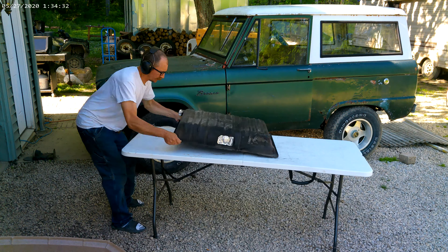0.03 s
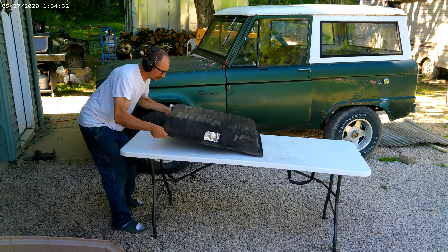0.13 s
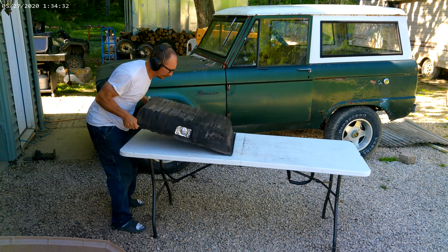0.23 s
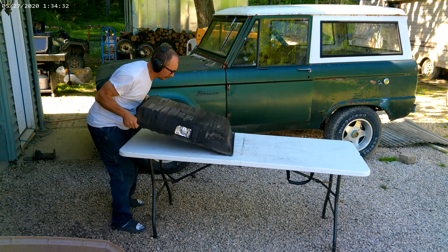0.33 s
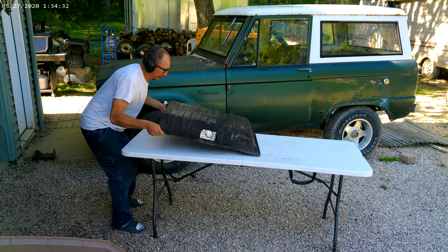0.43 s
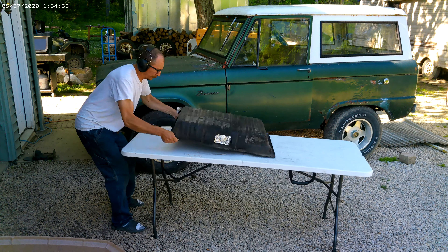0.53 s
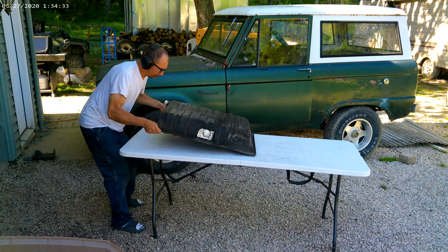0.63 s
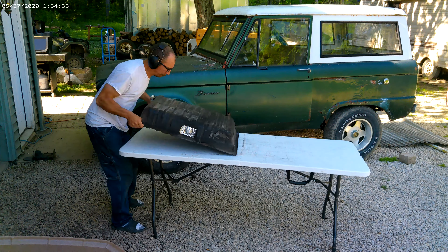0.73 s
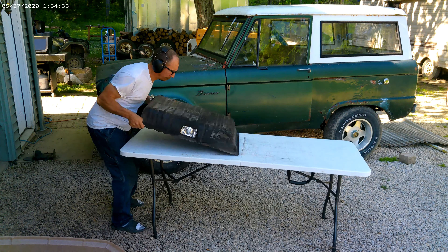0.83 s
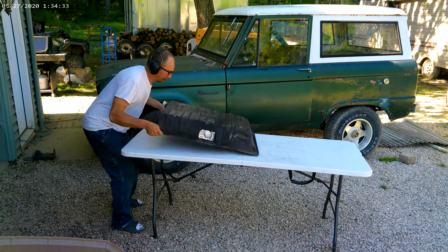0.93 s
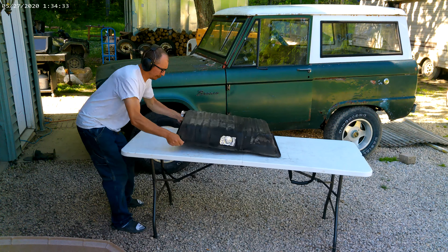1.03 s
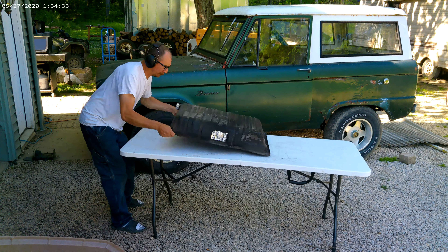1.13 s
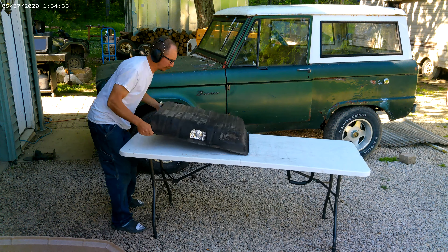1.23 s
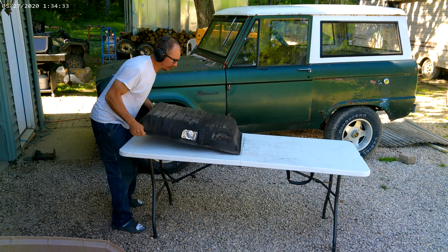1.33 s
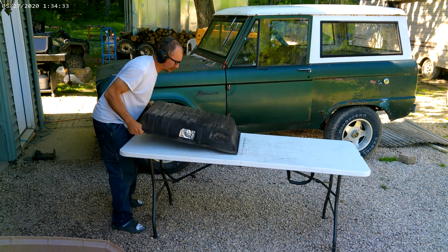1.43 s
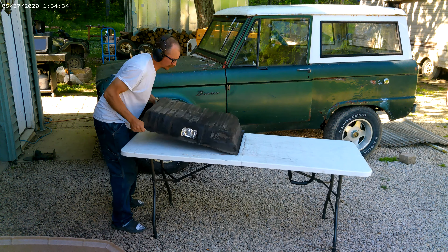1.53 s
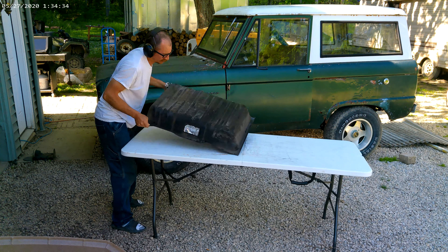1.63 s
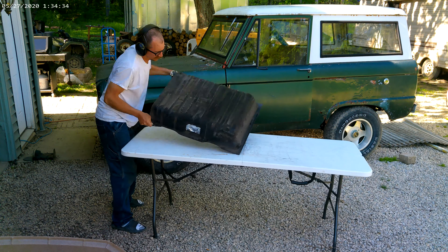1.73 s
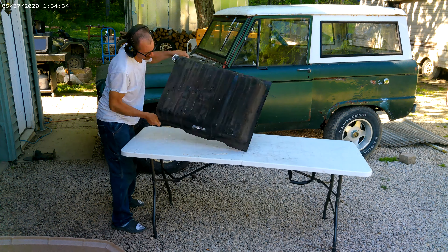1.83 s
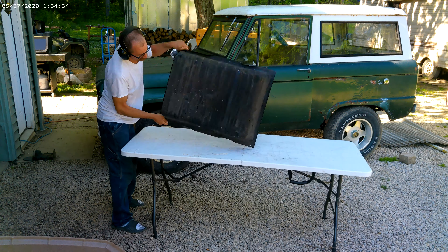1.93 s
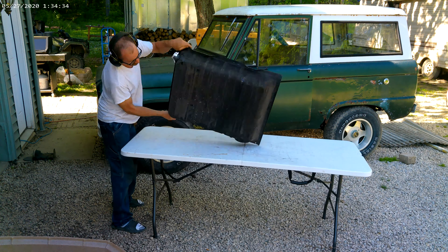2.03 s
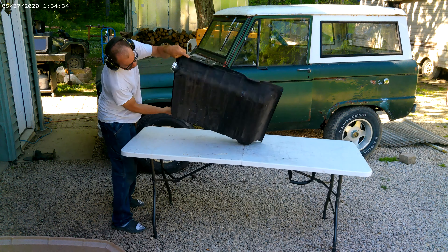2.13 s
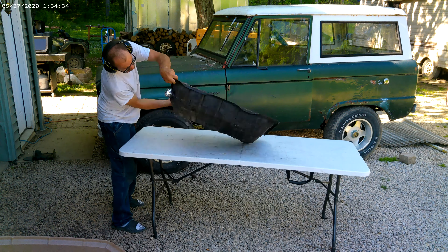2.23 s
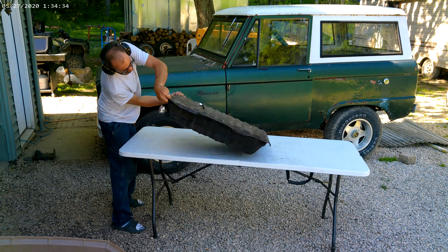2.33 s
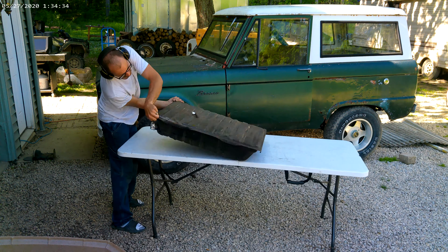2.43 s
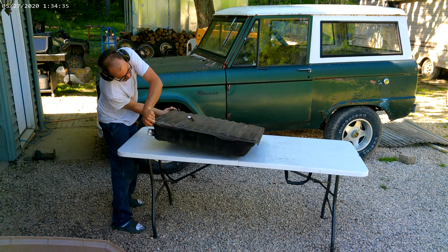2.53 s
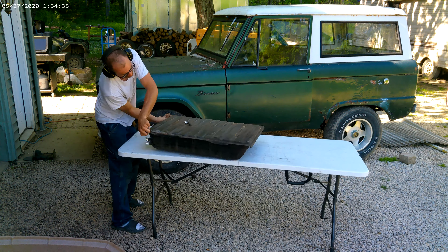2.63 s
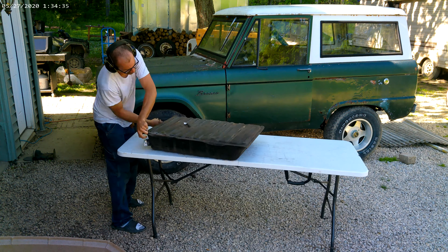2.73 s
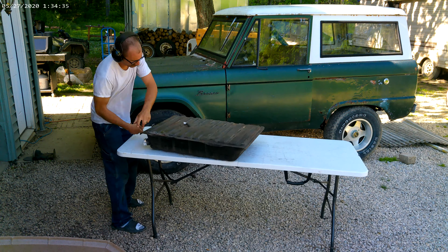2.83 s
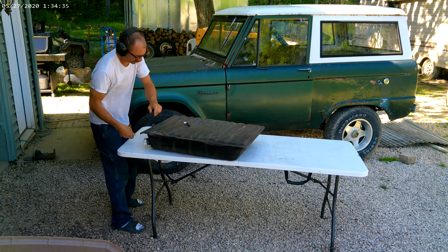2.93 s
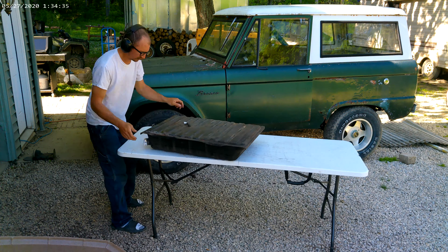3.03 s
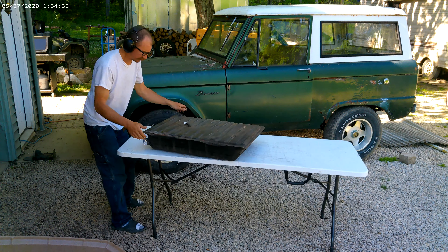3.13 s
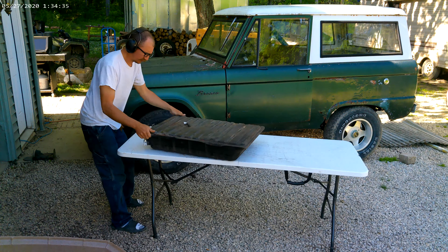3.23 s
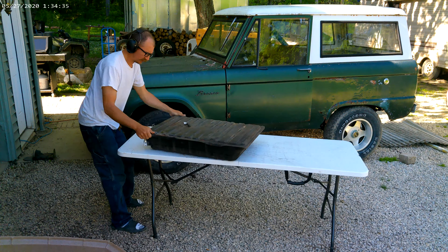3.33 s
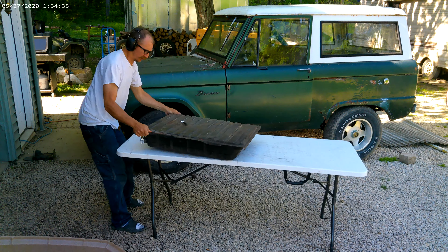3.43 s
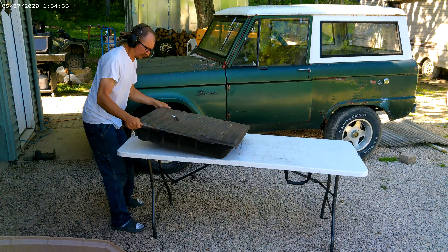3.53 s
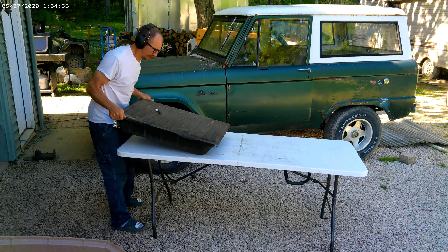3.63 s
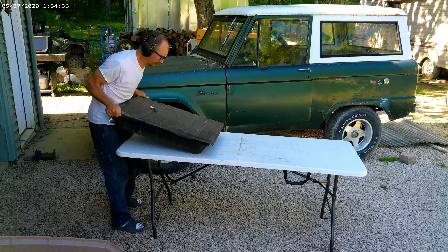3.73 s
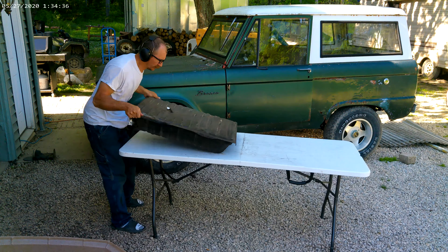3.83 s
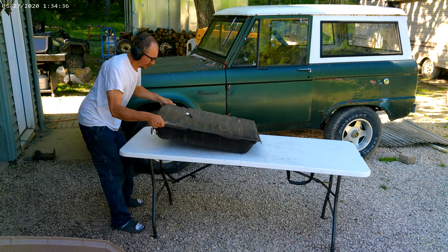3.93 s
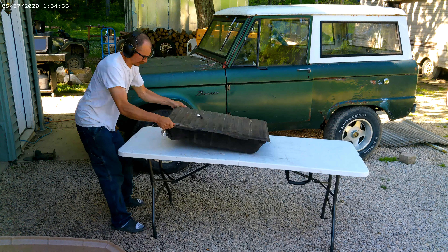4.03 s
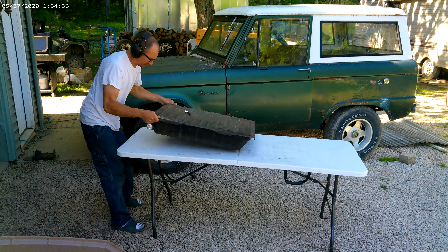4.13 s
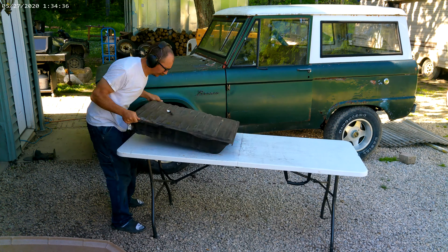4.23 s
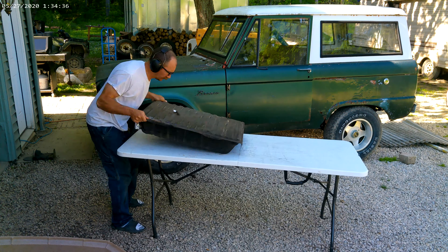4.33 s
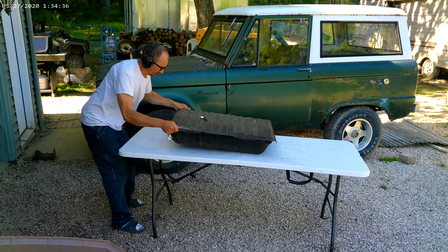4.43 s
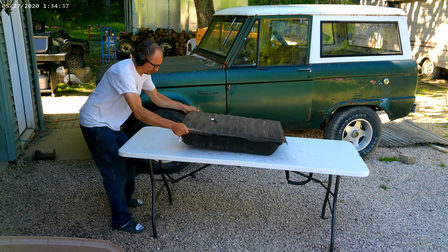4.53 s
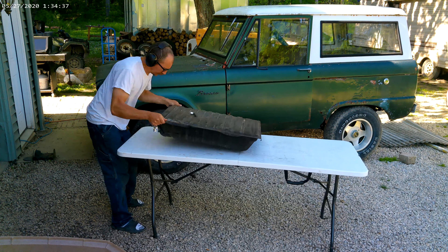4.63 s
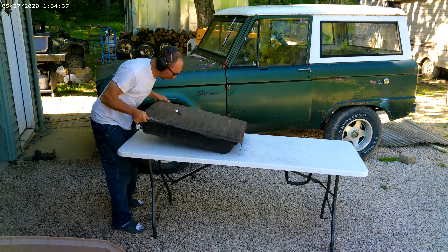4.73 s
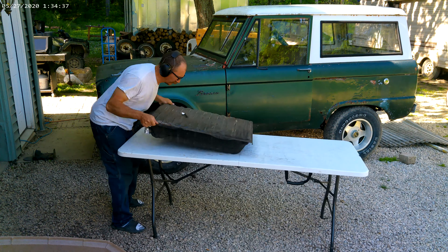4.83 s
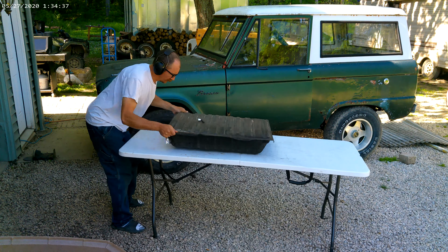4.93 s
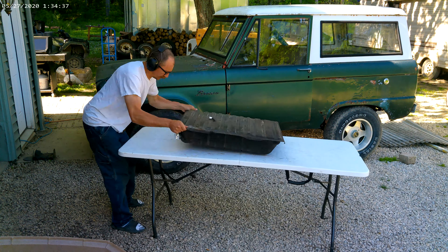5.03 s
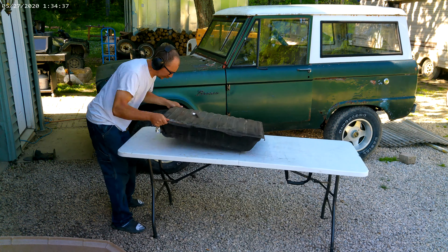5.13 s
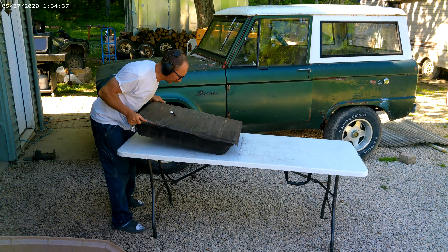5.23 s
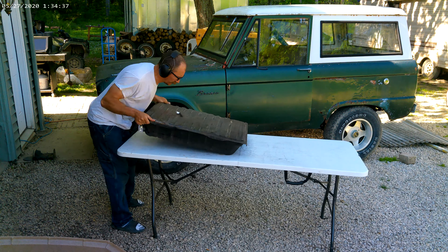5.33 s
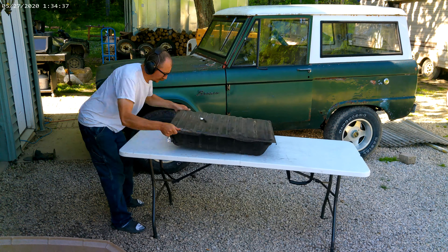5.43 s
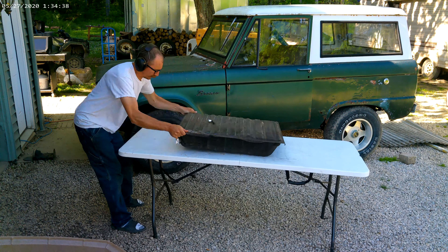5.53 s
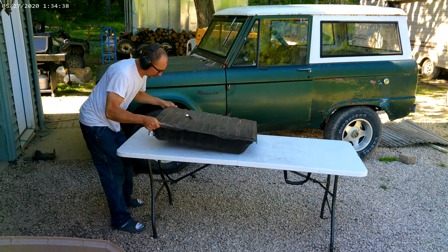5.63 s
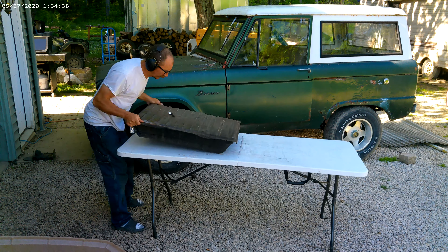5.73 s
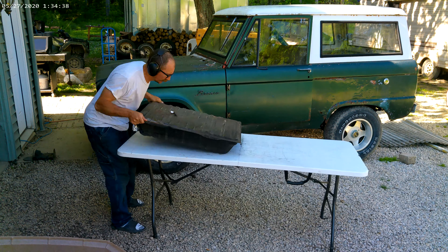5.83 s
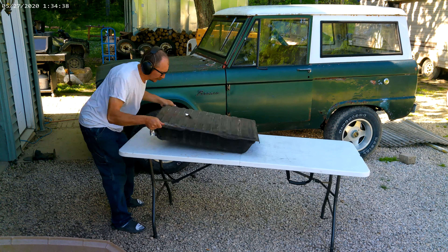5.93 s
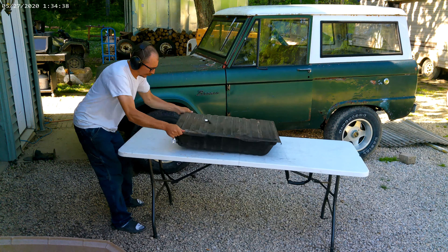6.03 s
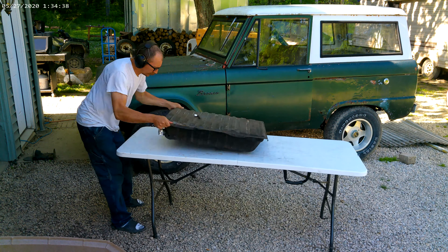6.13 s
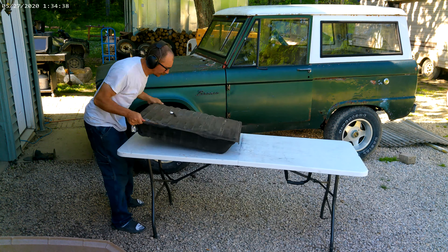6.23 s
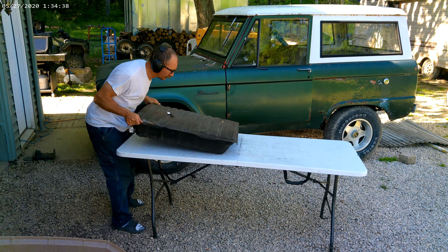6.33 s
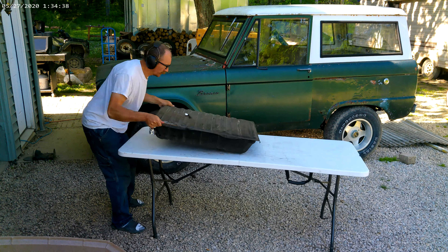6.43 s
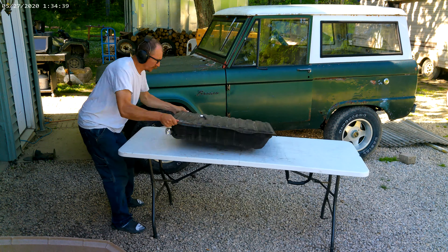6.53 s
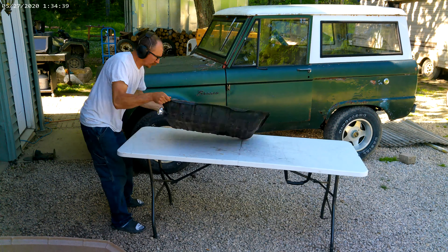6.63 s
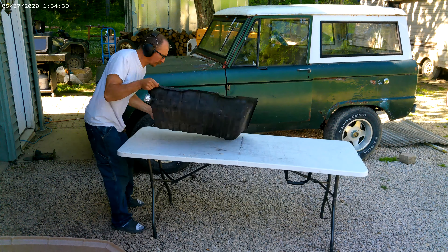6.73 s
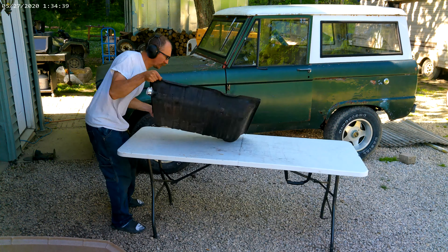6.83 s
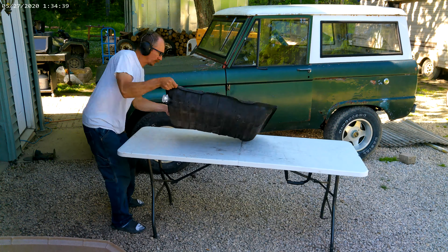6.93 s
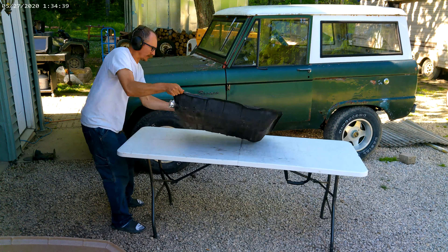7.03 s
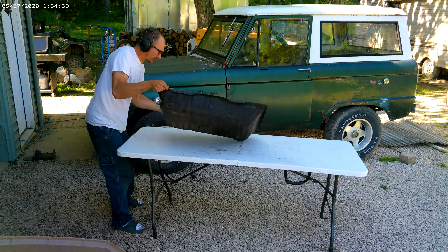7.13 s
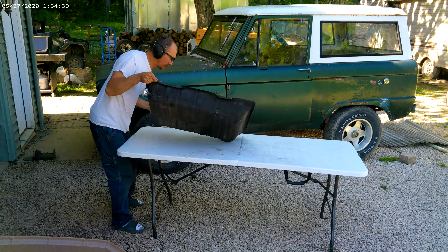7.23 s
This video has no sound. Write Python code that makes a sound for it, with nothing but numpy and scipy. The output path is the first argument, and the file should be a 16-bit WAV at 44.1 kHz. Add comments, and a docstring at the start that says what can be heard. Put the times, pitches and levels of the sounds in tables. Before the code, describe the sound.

Stones slide and slam around a hollow sheet-metal tank rocked by hand outdoors, with a sparse clacking lull before harsher, distorting crashes.

```python
"""Loose gravel slides and crashes inside a steel tank shoved to and fro on a plastic folding table outdoors.
Thousands of stone strikes a second ring the dense modes of the sheet steel while the load rolls and crashes.
Then the tank is tipped and turned over: handfuls spill, single stones clack and bounce, bumps drum the table.
At last the shoving resumes, harder; the table booms and the loudest crashes overload the microphone.
Under it all lies the quiet of the yard, a steady coloured noise."""
import sys
import numpy as np
from scipy import signal
from scipy.fft import rfft, irfft
from scipy.io import wavfile
from scipy.ndimage import uniform_filter1d

SR = 44100
rng = np.random.default_rng(int(sys.argv[2]) if len(sys.argv) > 2 else 0)


def transcribe(signal):
    """Save signal, clipped to [-1, 1], as a 16-bit WAV file at the path in sys.argv[1]."""
    frames = np.atleast_2d(signal).T
    limited = np.clip(frames, -1, 1)
    pcm = np.round(limited * 32767).astype(np.int16)
    wavfile.write(sys.argv[1], SR, pcm)


def boost_factor(decibels):
    """Convert a level in decibels to a linear amplitude factor."""
    exponent = np.asarray(decibels, float) / 20
    return 10 ** exponent


N = 321048

# The whole load hits an end wall when a shove or a pull jerks it.
# Each row: start in seconds, rattle level in dB rms, hold in seconds, sharpness in dB of treble.
CRASHES = [(0.108, -8.5, 0.043, 6), (0.615, -8.5, 0.064, 4.5), (1.101, -9, 0.035, 5.5),
           (3.814, -19, 0.14, -2.5), (4.066, -8.5, 0.035, 1), (4.338, -12.5, 0.13, 6),
           (4.574, -4, 0.046, 2), (5.041, -3.5, 0.034, 2), (5.578, -3.5, 0.02, 0), (6.09, -5, 0.034, 1),
           (6.35, -12, .06, -3), (7.084, -9.5, 0.022, 0)]


def evened(x):
    """Scales to rms 1."""
    return x / np.sqrt(np.mean(x ** 2) + 1e-20)


def read(points, hz):
    """Looks a value up on a log-frequency axis."""
    f, value = np.transpose(points)
    return np.interp(np.log(hz + 1), np.log(f + 1), value)


def coloured(points):
    """Steady noise of rms 1 with a given spectrum."""
    hz = np.fft.rfftfreq(N, 1 / SR)
    return evened(irfft(rfft(rng.standard_normal(N)) * boost_factor(read(points, hz)), N))


def smooth_noise(length, width, passes=1):
    """Slow random motion of rms 1: noise averaged over a width in samples."""
    noise = rng.standard_normal(length)
    for _ in range(passes):
        noise = uniform_filter1d(noise, size=width)
    return evened(noise)


def wandering_sine(hz, share, width, length):
    """A tone whose pitch wanders by a share of itself, smoothed over a width in samples."""
    wander = 1 + share * smooth_noise(length, width)
    return np.sin(2 * np.pi * hz * np.cumsum(wander) / SR)


def yard():
    """The quiet outdoors: faint steady noise, mostly low."""
    level_db = -51
    # Colour of the background. Each row: frequency in Hz, relative density in dB per Hz.
    yard_colour = [(12, -30), (20, -6), (41, 2), (97, -4.5), (571, -24), (674, -10), (1460, -21),
                   (1680, -53), (15000, -60)]
    return boost_factor(level_db) * coloured(yard_colour)


def surges(rows, rise_db_per_s, fall_db_per_s):
    """Power over time of each surge of gravel: rise, hold, fall."""
    start_s, db, hold_s = (column[:, None] for column in np.transpose(rows)[:3])
    t = np.arange(0, N, 64) / SR
    early_s = np.maximum(start_s - t, 0)
    late_s = np.maximum(t - start_s - hold_s, 0)
    return boost_factor(2 * (db - rise_db_per_s * early_s - fall_db_per_s * late_s))


def load():
    """Level, sharpness and weight of the rattle: rolling and surges add up, each colouring by its share."""
    # Gravel rolling between surges, as hard as the tank is moved. Each row: time in seconds,
    # rattle level in dB rms, sharpness in dB of treble, weight in dB of bass.
    rolling = [(0, -15.5, 5, 4.5), (1.0, -16.5, 6, 3), (1.44, -21, 5, 2.5), (1.47, -30, 0, -11),
               (1.63, -37.5, -3, 5), (1.72, -58.5, -3, 10), (1.86, -48, 2, 17), (1.97, -28, 3, 9),
               (2.1, -22, -0.5, 9), (2.42, -31.5, -16, 19), (2.72, -26.5, 0, -1), (2.87, -38.5, -6, -10),
               (3.06, -43.5, -5, 2), (3.43, -56.5, 0, 3), (3.59, -30.5, -2, -1), (3.79, -31.5, -1.5, 9),
               (3.85, -20.5, -4.5, 6.5), (4.3, -18.5, 0.5, 5.5), (4.8, -14, 0.5, 5), (6.3, -18.5, -4, 8.5),
               (6.85, -18, 1.5, 3.5), (7.1, -16, 3, 4), (7.28, -18.5, 4, 3)]
    # The load slides back along the floor on the pull.
    # Each row: start in seconds, level in dB rms, hold in seconds, sharpness in dB of treble.
    slides = [(.01, -15.5, 0.0054, 2), (.27, -13.5, 0.023, 2), (.44, -17.5, 0.043, 8.5),
              (.76, -16, 0.027, 1), (1.0, -26, 0.0067, 1), (1.23, -18.5, 0.023, -7), (.9, -17, 0.048, 3),
              (1.35, -15.5, 0.013, 3), (4.72, -16, 0.011, 7.5), (4.9, -7.5, 0.012, 1),
              (5.38, -10.5, 0.01, 3.5), (5.78, -14, 0.012, 2.5), (5.92, -11, 0.013, 3),
              (5.2, -15.5, 0.034, 7), (5.7, -13.5, .03, 3), (6.02, -20, 0.0064, 7),
              (6.23, -14.5, 0.058, 2.5), (6.47, -16, 0.033, 2), (6.66, -12.5, 0.012, 5.5),
              (6.99, -9.5, 0.022, 0.5)]
    # Handfuls spill over while the tank is tipped and turned.
    # Each row: start in seconds, level in dB rms, hold in seconds, sharpness in dB of treble.
    spills = [(1.5, -28, 0.031, -2), (1.99, -30, 0.013, -3.5), (2.085, -17, 0.0062, -0.5),
              (2.17, -18, 0.008, 4.5), (2.25, -18, 0.012, 3), (2.31, -9.5, 0.0077, 1),
              (2.385, -15, 0.017, 4), (2.47, -16.5, 0.0076, 3.5), (2.574, -21, 0.035, -3.5),
              (2.645, -16, 0.017, 4.5), (2.77, -30, 0.027, -4.5), (2.93, -31, 0.0046, -5),
              (2.995, -31.5, 0.0037, 1)]
    # Each kind: its rows, rise in dB per s, fall in dB per s, weight in dB of bass.
    kinds = [(CRASHES, 970, 164, -0.88), (slides, 108, 159, 0), (spills, 310, 510, -1.2)]

    t = np.arange(0, N, 64) / SR
    times, *columns = np.transpose(rolling)
    level_db, sharp_db, weight_db = (np.interp(t, times, column) for column in columns)
    power = boost_factor(2 * level_db)
    sharp, weight = power * sharp_db, power * weight_db
    for rows, rise, fall, kind_weight_db in kinds:
        each = surges(rows, rise, fall)
        power = power + each.sum(0)
        weight = weight + kind_weight_db * each.sum(0)
        sharp = sharp + np.transpose(rows)[3] @ each
    curves = (10 * np.log10(power), sharp / power, weight / power)
    return [np.interp(np.arange(N) / SR, t, curve) for curve in curves]


def table():
    """The hollow top drums under the load, booms at crashes, and answers each bump with one short note."""
    drum_db, drum_follow, drum_t60 = -33, 0.59, 0.9  # level, dB per dB of rattle, seconds
    crash_boom_db, bump_boom_db = -32.5, -23  # against the crash or bump itself
    thump_db, thump_hz, thump_t60 = -25, 38, 0.2  # the legs jolt at each crash
    # Colour of the hollow table top. Each row: frequency in Hz, relative density in dB per Hz.
    table_colour = [(20, -10), (50, -17), (86, 4), (120, -17), (160, 2.5), (250, -17), (400, -49)]
    # The tank bumping the top. Each row: start in seconds, note level in dB, pitch in Hz, t60 in seconds.
    bumps = [(2.009, -20, 432, 0.19), (2.078, -11.5, 463, 0.19), (2.329, -9, 530, 0.091),
             (2.461, -12.5, 291, 0.27), (2.745, -17, 425, 0.1), (3.495, -30, 420, 0.13)]

    seconds = np.arange(N) / SR
    power = boost_factor(2 * (drum_db + drum_follow * load()[0]))
    booms = [(s, db + crash_boom_db) for s, db, *_ in CRASHES]
    booms += [(s, db + bump_boom_db) for s, db, *_ in bumps]
    for s, db in booms:
        decay_db = db - 60 * np.abs(seconds - s) / drum_t60
        power = power + (seconds > s) * boost_factor(2 * decay_db)
    out = coloured(table_colour) * np.sqrt(np.abs(uniform_filter1d(power, size=600)))

    t = np.arange(SR // 2) / SR
    for s, db, hz, t60 in bumps:
        envelope = boost_factor(db - 60 * t / max(t60, 0.02)) * (1 - np.exp(-t / 0.0051))
        out[round(s * SR):][:len(t)] += envelope * wandering_sine(hz, 0.035, 500, len(t))
    for s, db, *_ in CRASHES:
        thump = boost_factor(db + thump_db - 60 * t / thump_t60) * np.sin(2 * np.pi * thump_hz * t)
        part = out[round(s * SR):][:len(t)]
        part += thump[:len(part)]
    return out


def shares(hz):
    """Splits a spectrum in bass, middle, treble and top; the four sum to 1."""
    below = [1 / (1 + (hz / edge_hz) ** 4) for edge_hz in (550, 4280, 9300)]
    return np.diff([0 * hz, *below, 1 + 0 * hz], axis=0)


def dense_modes(count, size):
    """Steel modes too close to tell apart: coloured noise dying at each frequency's own rate, by band."""
    spot_colour_db = 3  # how far the colour differs from spot to spot
    # Colour of the struck steel. Each row: frequency in Hz, relative density in dB per Hz.
    wall_colour = [(59, -31), (100, -16), (129, -21.5), (209, -8.5), (243, -5.5), (420, 0.5), (576, -2),
                   (697, 0), (1550, -2), (2520, -0.5), (3180, -6.5), (5750, -13), (9150, -25), (15500, -45)]
    # How long the steel rings. Each row: frequency in Hz, t60 in seconds.
    wall_t60 = [(200, 0.46), (530, 0.22), (1390, 0.19), (3680, 0.14), (9700, 0.16)]

    hz = np.fft.rfftfreq(size + 512, 1 / SR)
    wiggle = rng.standard_normal((count, 14))
    wiggle -= wiggle.mean(0)  # on average the spots have the wall's colour
    wiggle_hz = np.geomspace(200, 16000, num=14)
    colour_db = [read(wall_colour, hz) + spot_colour_db * read(np.c_[wiggle_hz, w], hz) for w in wiggle]
    noise = rfft(rng.standard_normal((count, size + 512))) * boost_factor(colour_db)
    bands = irfft(shares(hz)[:, None] * noise)
    frame_hz, frame_s, z = signal.stft(bands, SR, nperseg=256)
    t60 = np.maximum(read(wall_t60, frame_hz), 0.01)[:, None]
    dying = boost_factor(-60 * np.abs(frame_s - 256 / SR) / t60) / np.sqrt(t60)
    return signal.istft(z * dying, SR, nperseg=256)[1][..., 256:256 + size]


def panel_modes(count, size):
    """Panel modes that stand out of the dense ringing: dying sines, driven and detuned spot by spot."""
    # Each row: frequency in Hz, t60 in seconds, relative level in dB lying on the first face,
    # relative level in dB after the tank is turned over.
    panels = [(248.8, 0.2, -5, -11), (347.7, 0.41, -4.5, -7), (399.5, 0.09, -6.5, -0.5),
              (440.4, 0.1, -6.5, 1), (514, 0.042, 5.5, -1.5), (607.5, 0.18, -7.5, -37),
              (703, 0.099, -0.5, -2.5), (785, 0.092, -10, -3.5), (891, 0.26, 0, -6.5),
              (1080, 0.029, -26, -0.5), (1231, 0.16, -1.5, -4.5), (1385, 0.032, -6, -2.5),
              (2182, 0.086, -4, -2), (2405, 0.074, -29, -6), (2620, 0.095, -24, -28),
              (3315, 0.064, -7, -12)]
    t = np.arange(size) / SR
    out = 0
    for hz, t60, *face_db in panels:
        reach = np.cos(2 * np.pi * rng.random((count, 1)))  # each spot drives each panel by its own amount
        detune = 1 + 0.021 * rng.standard_normal((count, 1))  # gravel lying on a panel shifts its pitch
        spot_db = np.repeat(face_db, count // 2)[:, None]
        decay = boost_factor(spot_db - 60 * t / t60) / np.sqrt(t60)
        ring = reach * np.sin(2 * np.pi * hz * detune * t) * decay
        out = out + shares(hz)[:, None, None] * ring
    return out


def wall_rings(count=24, size=16384):
    """The wall's answer to a strike at each spot (half per face), by band, mean energy 1 in all."""
    panels_db = -5  # against the dense modes
    crack_db, crack_t60 = 5.5, 0.022  # the struck spot itself: louder than the ring and soon gone
    t = np.arange(size) / SR
    # bending waves take a moment to spread, the bass longest: bass, middle, treble, top in seconds
    rise_s = np.reshape([0.0043, 0.0015, 0.00049, 0.0008], (-1, 1, 1))
    rise = 1 - np.exp(-t / rise_s)
    crack = 1 + boost_factor(crack_db - 60 * t / crack_t60)
    dense = dense_modes(count, size) * crack * rise
    rings = evened(dense) + boost_factor(panels_db) * evened(panel_modes(count, size)) * rise
    return rings / np.sqrt(np.sum(rings.sum(0) ** 2) / count)


def strike_force(level_db):
    """Random strikes of either sign in clumps; the shove sets the energy that a moment's strikes share."""
    strikes_per_s, size_spread_db, clump_db = 2200, 4, 2
    size = boost_factor(size_spread_db * np.minimum(rng.exponential(1, N), 4)) * rng.choice([-1, 1], N)
    clumps = boost_factor(clump_db * smooth_noise(N, 600))
    strikes = size * clumps * (rng.random(N) < strikes_per_s / SR)
    spent = uniform_filter1d(uniform_filter1d(strikes ** 2, size=1000), size=1000)
    return evened(strikes / np.sqrt(np.abs(spent) + 1e-9)) * boost_factor(level_db)


def gravel():
    """Dense strikes and single stones each hit one spot of the wall; a single stone adds its own clack."""
    turned_s = 2.0  # from here on the tank lies on its other face
    clack_db, clack_t60 = -9.5, 0.045  # against the stone's strike level, seconds
    flicker_db, top_sharpness = 2.5, 1.47  # the top follows sharpness more steeply than the treble
    # Stones heard one by one. Each row: time in seconds, peak level in dB before colouring,
    # sharpness in dB of treble, weight in dB of bass, pitch of the stone's own clack in Hz.
    stones = [(2.06, -17, 0, -4, 2180), (2.205, -14, 6, -3, 5000), (2.509, -20, 6, 2, 5000),
              (2.85, -27, 2, -4, 4000), (3.941, -13, 5.5, -1, 5960), (0.591, -15, 14, -2, 5030),
              (1.768, -38, 0, 0, 3000), (3.406, -49, 0, -5, 3500), (3.498, -35, -13, 2, 1000),
              (5.232, -8, 14, -4, 6540), (0.8872, -10.5, 14, -4, 4270), (1.485, -20, -8, -4, 2910),
              (1.6931, -37.5, 6, 12, 4060), (1.8407, -29.5, -5, 2, 2870), (1.8791, -23.5, -3, 5, 3010),
              (1.9794, -13.5, -7, 9, 3000), (2.2355, -6, 0, 1, 3050), (2.2847, -6.5, 8, 5, 5900),
              (2.572, -9, -10, -9, 2950), (2.7581, -21.5, 8.5, 17.5, 3420), (2.8973, -24, 1, -10, 3590),
              (2.9222, -12.5, -4, -5, 3400), (2.9935, -15.5, -22, -15, 3340), (3.063, -31, 2, -7, 3600),
              (3.134, -4, -4, -11, 3460), (3.2298, -18, -2, -22, 3500), (3.3047, -22, -5, -12, 2850),
              (3.5251, -24.5, -3, 3, 3080), (3.5723, -25.5, -6, 12, 3020), (3.6225, -19.5, -12, 0, 3030),
              (3.8232, -17, 3, 10, 2940), (4.5181, -11, 17.5, -2, 2940), (5.5038, -17.5, 14.5, -6, 5100),
              (6.0124, -5.5, 1, -11, 2920), (6.354, -8, -13, -6, 2930), (7.24, 1.5, -7, -15, 2980)]

    rings = wall_rings()
    level_db, sharp_db, weight_db = load()
    force = strike_force(level_db)
    face = rings.shape[1] // 2  # spots per face
    turned = np.arange(N) > turned_s * SR
    spot = rng.integers(0, face, N) + face * turned
    peak = np.abs(rings.sum(0)).max(1)

    out, t = np.zeros(N), np.arange(2048) / SR
    for s, db, sharp, weight, hz in stones:
        n = round(s * SR)
        force[n] = boost_factor(db) / peak[spot[n]]
        sharp_db[n], weight_db[n] = sharp, weight
        envelope = boost_factor(db + clack_db - 60 * t / clack_t60) * (1 - np.exp(-t / 0.00064))
        clack = envelope * wandering_sine(hz, 0.06, 60, len(t))  # a rough stone's note is smeared
        out[n:][:len(t)] += clack[:N - n]

    # harder and softer stones take turns, so the treble flickers
    treble_flicker = flicker_db * smooth_noise(N, 1500, passes=2)
    top_flicker = flicker_db * smooth_noise(N, 1500, passes=2)
    treble_db = sharp_db + treble_flicker / 2
    top_db = top_sharpness * sharp_db + top_flicker
    for band, db in zip(rings, (weight_db, 0, treble_db, top_db)):
        band_force = force * boost_factor(db)
        for k, answer in enumerate(band):
            out += signal.oaconvolve(band_force * (spot == k), answer)[:N]
    return out


def scene():
    """The quiet of the yard, the table and the gravel, in one channel."""
    return (yard() + table() + gravel())[None]


def low_pass(x):
    """Removes everything above the highest recorded frequency."""
    return signal.sosfilt(signal.butter(12, 15740, fs=SR, output="sos"), x)


def record(dry):
    """The input clips hard at its ceiling and carries a small steady offset."""
    ceiling, offset = 0.72, 0.0074  # of digital full scale
    mix = np.clip(dry, -ceiling, ceiling) + offset
    return low_pass(mix)


dry = scene()
out = record(dry)
transcribe(out)
```